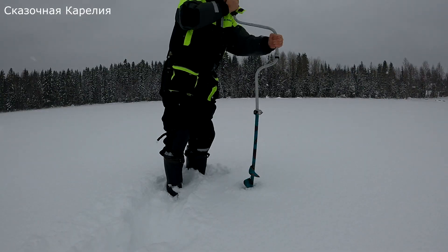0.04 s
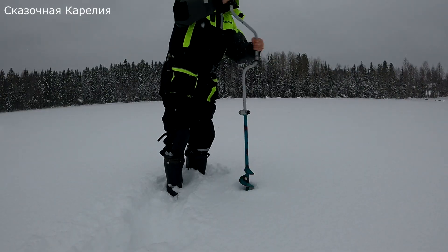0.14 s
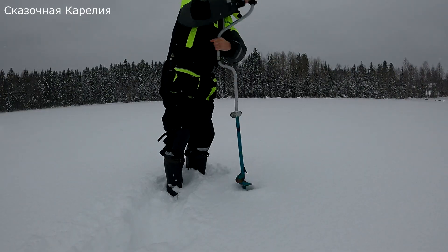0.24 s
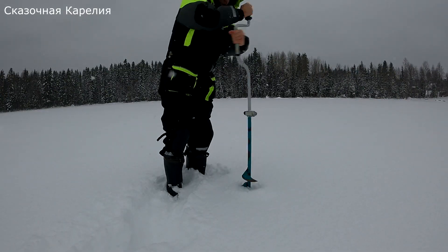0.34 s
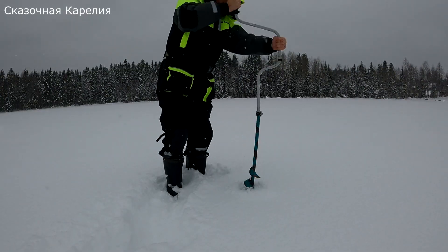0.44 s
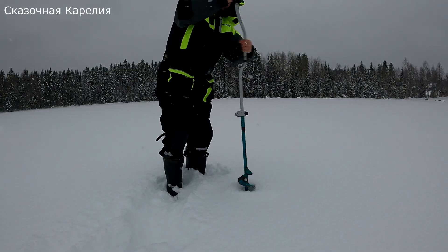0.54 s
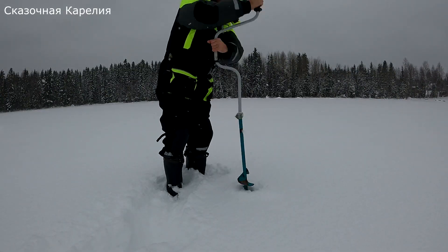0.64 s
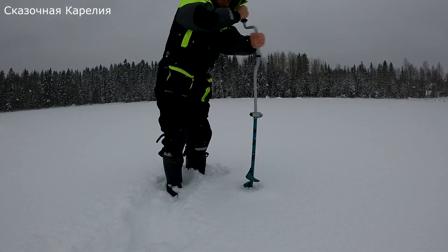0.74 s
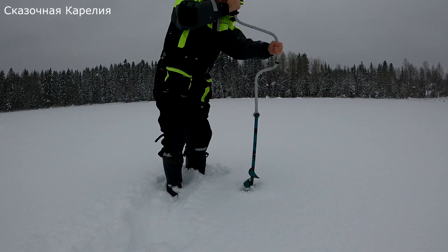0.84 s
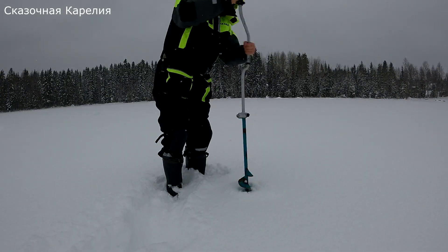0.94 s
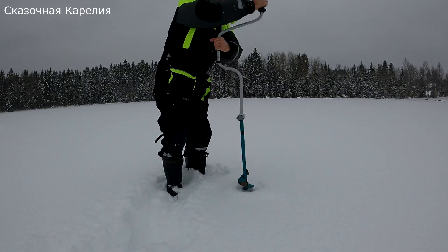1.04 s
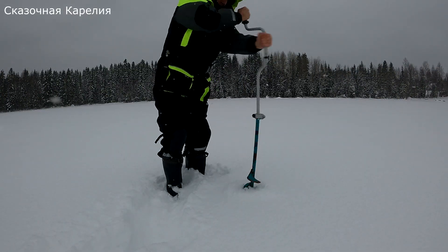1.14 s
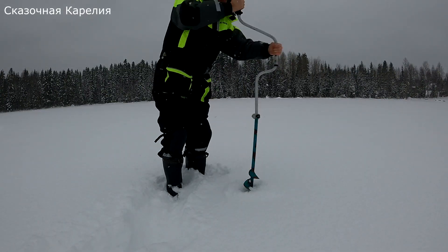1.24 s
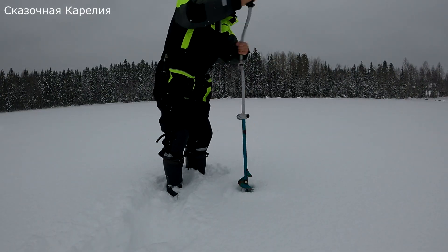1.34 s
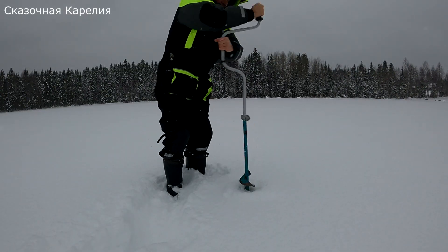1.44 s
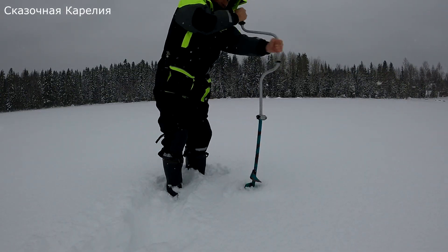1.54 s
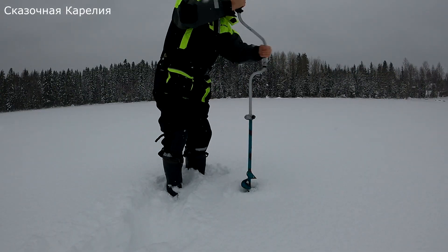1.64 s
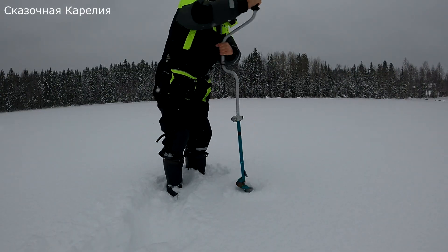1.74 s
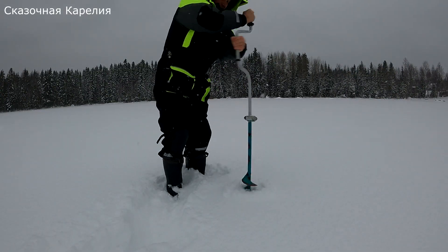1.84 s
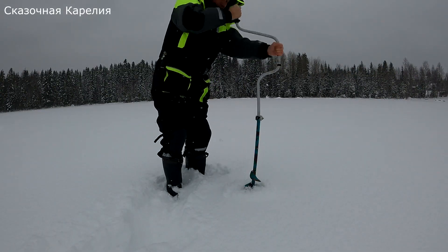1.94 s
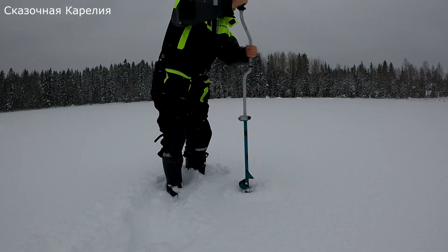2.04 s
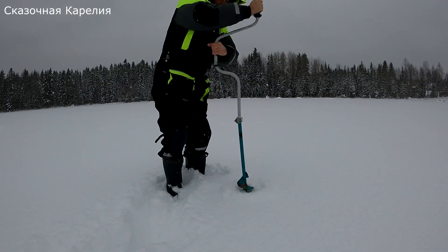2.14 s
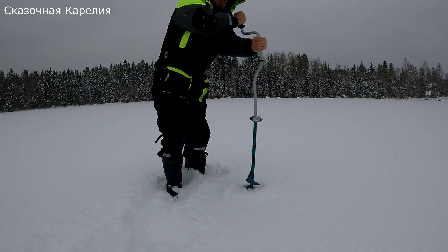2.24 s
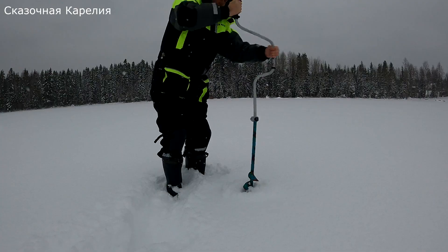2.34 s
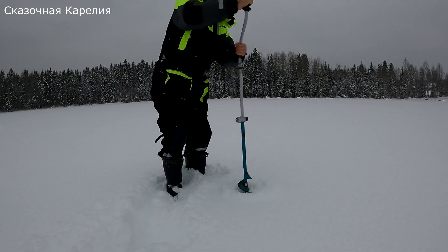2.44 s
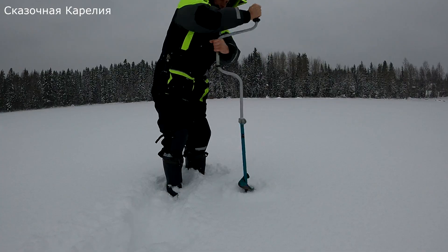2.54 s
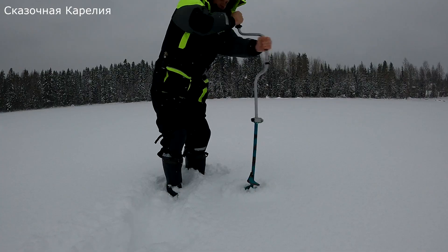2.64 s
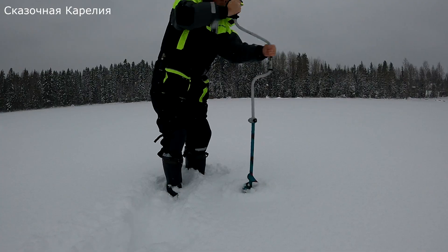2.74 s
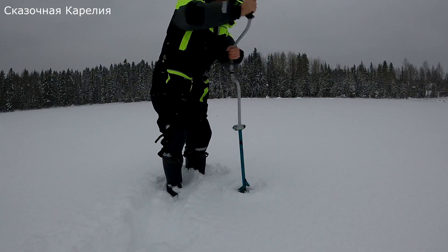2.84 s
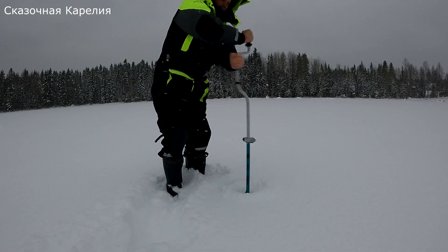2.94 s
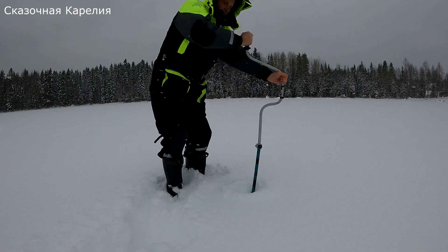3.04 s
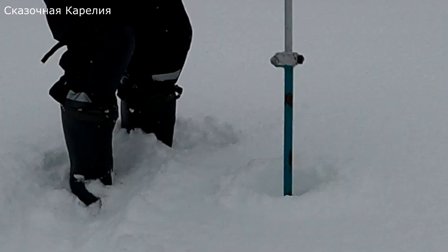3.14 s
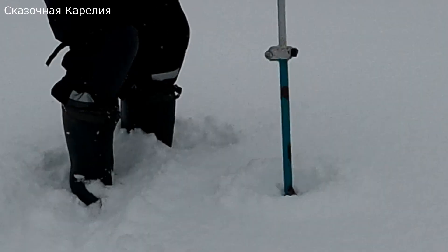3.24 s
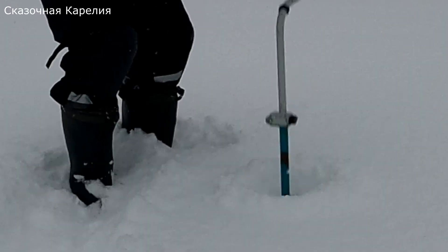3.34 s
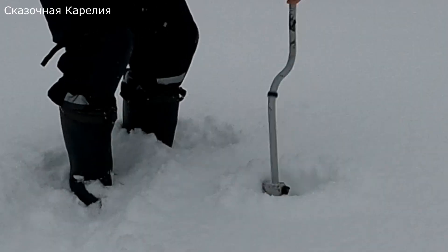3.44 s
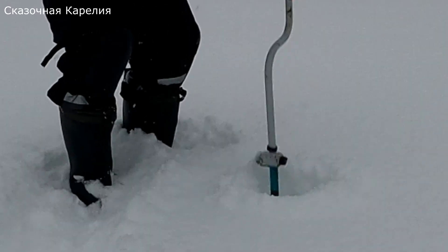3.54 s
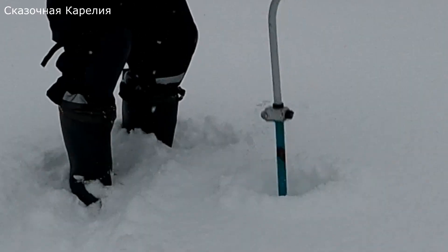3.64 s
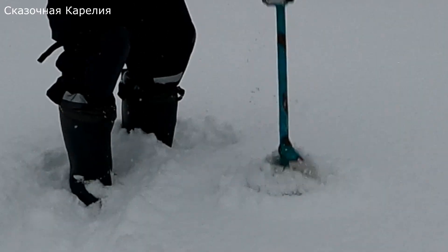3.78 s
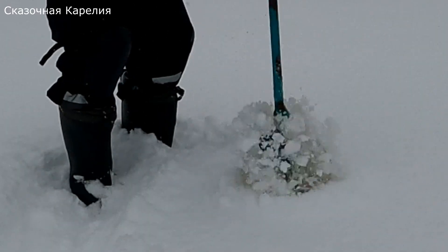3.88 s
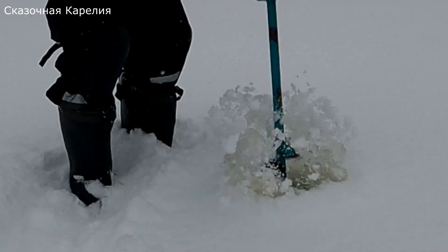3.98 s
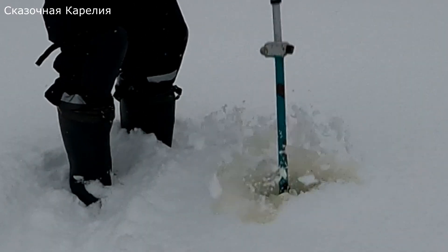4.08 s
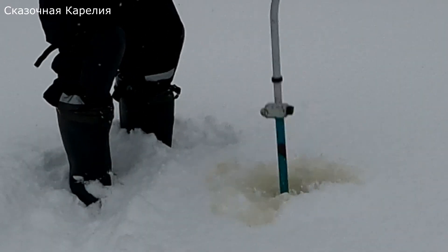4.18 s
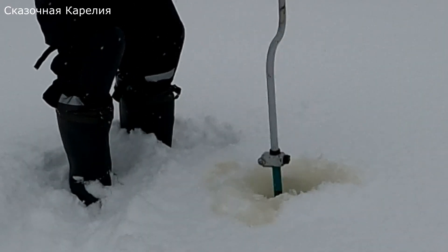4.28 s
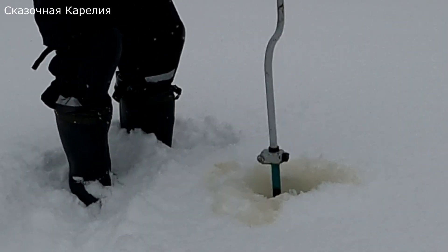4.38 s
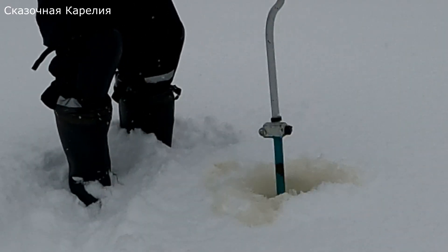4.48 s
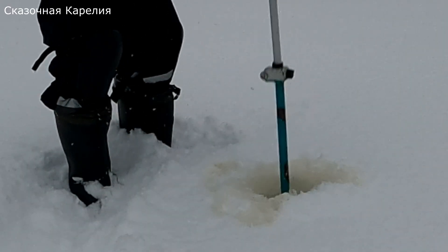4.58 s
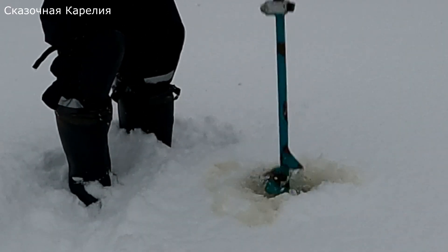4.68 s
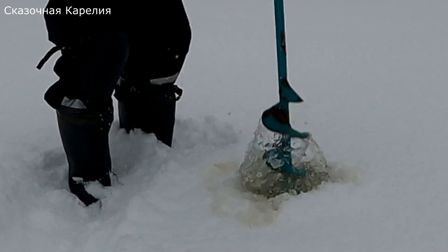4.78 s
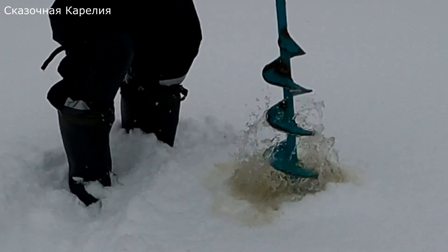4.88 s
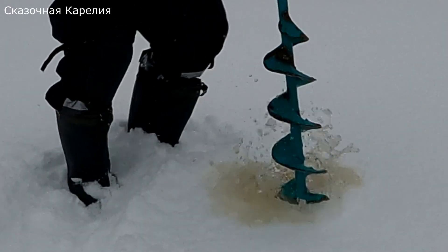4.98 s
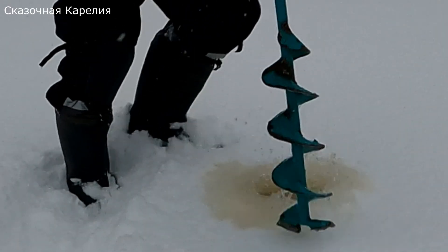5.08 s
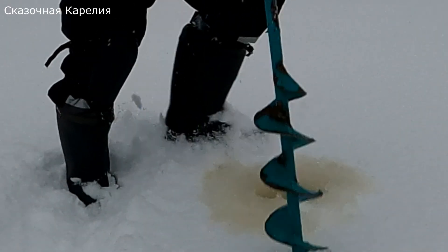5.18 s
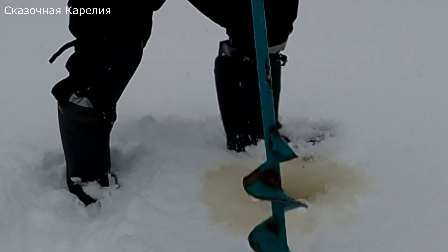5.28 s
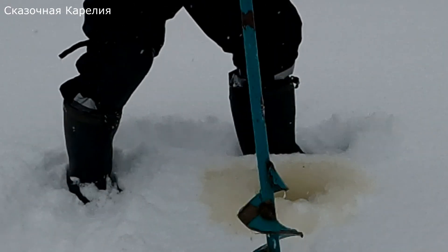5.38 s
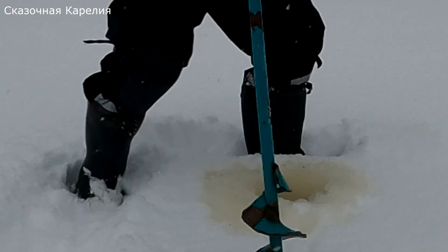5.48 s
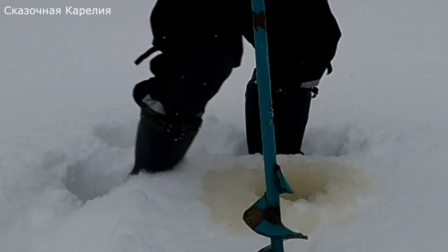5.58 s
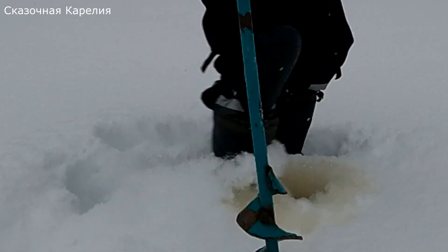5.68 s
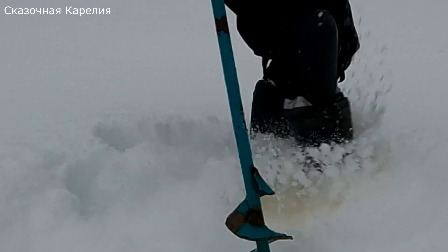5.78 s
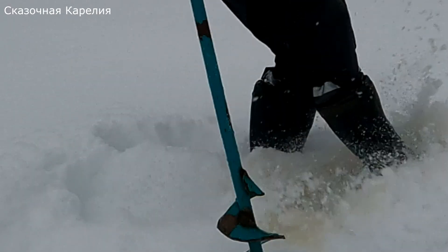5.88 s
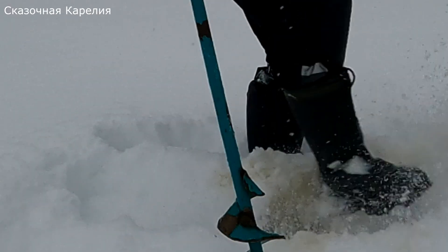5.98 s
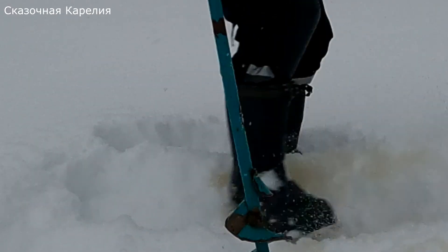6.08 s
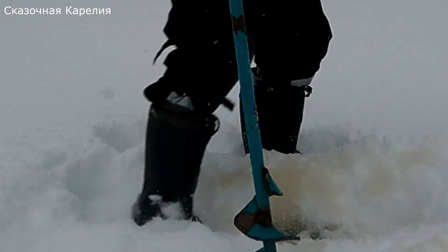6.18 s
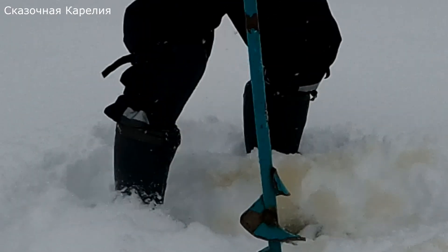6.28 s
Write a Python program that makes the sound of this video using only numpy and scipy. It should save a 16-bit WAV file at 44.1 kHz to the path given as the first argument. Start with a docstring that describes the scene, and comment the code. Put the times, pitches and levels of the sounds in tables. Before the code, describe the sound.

Gritty metallic grinding pulses about three times a second, stops abruptly, then wet splashes, bubbling gulps and low thumps from an ice hole.

```python
"""Hand auger through lake ice

Chips rattle the steel flights of a hand auger, swelling with each pull of the crank: noise excites drifting modes.
The blades break through and the auger is pumped in the hole. Slush splashes as enveloped noise and small bubbles;
trapped air, low knocks and small drips sound as short rising tones, and the hole booms as resonant low noise.
A boot kicks the slush away. A light wind presses on the microphone as very low noise. Left and right are nearly alike.
"""
import sys
import numpy as np
from scipy import signal
from scipy.fft import rfft, irfft, next_fast_len
from scipy.io import wavfile
from scipy.ndimage import uniform_filter1d, map_coordinates

SR = 44100
rng = np.random.default_rng(int(sys.argv[2]) if len(sys.argv) > 2 else 0)


def master_out(mix):
    """Clip the mix to full scale and print it as 16-bit PCM to the path in sys.argv[1]."""
    frames = np.transpose(np.atleast_2d(mix))
    ceiling = np.clip(frames, -1, 1)
    pcm = np.round(ceiling * 32767).astype(np.int16)
    wavfile.write(sys.argv[1], SR, pcm)


N = 278530


def amp(db):
    """Level in decibels to amplitude ratio."""
    return 10 ** (np.asarray(db) / 20)


def unit(x):
    """Normalisation to an rms of 1."""
    return x / np.sqrt(np.mean(x ** 2) + 1e-20)


def colour(points):
    """Spectral envelope: gain interpolated in dB between (Hz, dB) points on a log frequency axis."""
    f, level_db = np.transpose(points)
    return lambda hz: amp(np.interp(np.log(hz + 1), np.log(f + 1), level_db))


def modes(rows):
    """Modal superposition: noise-fed resonances (Hz, width Hz, dB) add in power."""
    def gain(f):
        power = 0
        for centre, width, db in rows:
            damping = (f * width) ** 2
            power = power + amp(db) ** 2 * damping / ((centre * centre - f * f) ** 2 + damping)
        return np.sqrt(power)
    return gain


def gains(rows):
    """Level automation: one gain per sample for each dB column, interpolated in dB over time."""
    s, *columns = np.transpose(rows)
    return [amp(np.interp(np.arange(N) / SR, s, db)) for db in columns]


def wobble(rate):
    """Band-limited random drift: a smooth curve through normal draws, rate knots a second (at most 390)."""
    knots = rng.standard_normal(int(N / SR * 400))
    return map_coordinates(knots, [np.arange(N) * min(rate, 390) / SR])


def filtered(x, response):
    """Linear filtering: the spectrum of x times a complex response of frequency."""
    m = next_fast_len(N + SR // 2)
    return irfft(rfft(x, m) * response(np.fft.rfftfreq(m, 1 / SR)), m)[..., :N]


def grit(spiky_db, clump_db, rate):
    """Granular impact noise: white noise with spiky sample sizes that come in clumps; rms 1."""
    spikes = np.minimum(rng.exponential(size=N), 5)
    clumps = np.tanh(wobble(rate) / 2)
    return unit(rng.standard_normal(N) * amp(spiky_db * spikes + clump_db * clumps))


def patchy(x, depth_db, size=8):
    """Spectro-temporal modulation: random gain patches, size bins by size frames; rms 1."""
    z = signal.stft(x, nperseg=512)[2]
    field = uniform_filter1d(rng.standard_normal(z.shape), size=size, axis=0)
    field = uniform_filter1d(field, size=size, axis=1)
    return unit(signal.istft(z * amp(depth_db * unit(field)), nperseg=512)[1][:N])


def lump(t, length, rise):
    """Transient envelope: quick rise, then a smooth fall."""
    return np.exp(-(t / length) ** 1.51) * (1 - np.exp(-t / (rise * length)))


def auger():
    """Fracture noise drives modal ringing: chips break off in bursts and ring the steel; the shavings hiss."""
    # spectrum of the breaking chips: pitch_hz, level_db
    chip_spectrum = [(90, 2), (500, 3), (2000, 0), (4300, -0.5), (6500, -18), (9000, -53)]
    # spectrum of the hissing shavings: pitch_hz, level_db
    shaving_spectrum = [(4500, -14), (7200, -5), (11400, -5.5), (15900, -14.5)]
    chatter, hiss, sheen = cranking()
    bite = wobble(40.07)  # shared by chips and shavings
    chips = grit(spiky_db=3.2, clump_db=5.5, rate=200) * amp(1.2 * bite)
    body = patchy(flights(filtered(chips, colour(chip_spectrum))), depth_db=1.5, size=8)
    blades = filtered(body, lambda hz: np.exp(-((hz - 3200) / 900) ** 2))
    body = body + ((chatter / amp(-27.0)) ** 0.55 - 1) * blades  # a harder bite rings the blade modes more
    top_modes = filtered(body, lambda hz: np.exp(-((hz - 5300) / 1200) ** 2))
    body = body + (sheen - 1) * top_modes
    shavings = grit(spiky_db=2.0, clump_db=4.0, rate=110) * amp(1.4 * bite)
    shavings = filtered(shavings, colour(shaving_spectrum))
    return chatter * body + hiss * patchy(shavings, depth_db=2.5, size=12)


def cranking():
    """Periodic forcing by the crank: chatter, hiss and top-mode gains, the chatter sagging between half turns."""
    # half turns of the crank: start_s, chatter_db, shaving_hiss_db, chatter_dip_at_start_db
    strokes = [(-0.22, -24, -34, 8), (0.149, -25.5, -35, 3.5), (0.58, -25.5, -34, 2.5),
               (0.93, -25.5, -36, 1), (1.35, -25.5, -36, 1), (1.721, -27, -35, 2.5), (2.049, -26, -33, 4),
               (2.428, -27.5, -34.5, 2.5), (2.83, -27, -36.5, 2.5)]
    # blades digging in: centre_s, extra_chatter_db, extra_hiss_db
    catches = [(0.378, 3.5, -1.5), (0.508, 4.5, 3.5), (0.69, 3.5, 0), (1.106, 3, -2), (1.175, 3.5, 1.5),
               (1.268, 4.5, 4.5), (1.57, 0, 4), (1.74, 1, 5), (1.94, 2.5, 4), (2.942, 3.5, -2.5)]
    catch_s = 0.033  # Gaussian width of a catch
    slack_share = 0.16  # Gaussian width of the hands' change-over, as a share of a stroke
    dull_start_db = 4  # the top steel modes are this much weaker at the start of a stroke than at its end
    # the blades break through and fall silent
    through_s, chatter_fade_db_per_s, hiss_fade_db_per_s = 2.955, 130, 306

    t = np.arange(N) / SR
    start, chatter_db, hiss_db, dip_db = np.transpose(strokes)
    last = len(start) - 1
    ends = np.append(start, 2 * start[-1] - start[-2])  # the last stroke lasts as long as the one before
    turn = np.interp(t, ends, np.arange(len(start) + 1))
    stroke = np.minimum(turn.astype(int), last)
    nearest_start = np.minimum(np.round(turn).astype(int), last)
    done = turn - stroke  # share of the stroke completed
    slack = np.exp(-(np.minimum(done, 1 - done) / slack_share) ** 2)
    chatter_db = chatter_db[stroke] - dip_db[nearest_start] * slack
    hiss_db = hiss_db[stroke]
    for s, more_db, brighter_db in catches:
        dig = np.exp(-((t - s) / catch_s) ** 2)
        chatter_db = chatter_db + more_db * dig
        hiss_db = hiss_db + brighter_db * dig
    after = np.maximum(t - through_s, 0)
    chatter = amp(chatter_db - chatter_fade_db_per_s * after)
    hiss = amp(hiss_db - hiss_fade_db_per_s * after)
    sheen = amp(-dull_start_db * (1 - done) ** 3)
    return chatter, hiss, sheen


def flights(x):
    """Time-varying resonance: the steel modes drift and trade strength as the load on the blades shifts."""
    # steel modes at rest: pitch_hz, width_hz, level_db
    steel_modes = [(558.6, 7.5, 11.5), (1043, 85, 8), (1354, 23, 12.5), (1604, 9, 15.5), (1830, 205, 8),
                   (2607, 27, 13.5), (3040, 220, 4), (3440, 90, 4), (3714, 28, 7.5), (5015, 250, 10),
                   (5493, 82, 18.5), (6080, 77, 18)]
    # scale of the random pitch drift (share) and level swing, knots of the swing curve a second
    wander, swap_db, swap_rate = 0.012, 3, 32
    hz, t, z = signal.stft(x, SR, nperseg=1024)
    at = np.minimum((t * SR).astype(int), N - 1)
    moving = []
    for centre, width, db in steel_modes:
        drifting_hz = centre * (1 + wander * wobble(swap_rate / 2)[at])
        swinging_db = db + swap_db * wobble(swap_rate)[at]
        moving.append((drifting_hz, width, swinging_db))
    gain = np.hypot(1, modes(moving)(hz[:, None]))  # the modes add in power to the direct sound
    return signal.istft(z * gain, SR, nperseg=1024)[1][:N]


def slush():
    """Turbulent splash noise with bubble resonance: wash and fizz, loud in each splash, trickling between."""
    # trickle between splashes: time_s, wash_db, fizz_db
    trickle = [(2.9, -97, -76), (3.0, -40.5, -46.5), (3.23, -47.5, -47), (3.4, -38, -48),
               (3.64, -61.5, -60.5), (3.73, -41.5, -45.5), (4.15, -33, -41.5), (4.53, -43.5, -47.5),
               (4.75, -34, -42.5), (5.35, -51.5, -54.5), (6.02, -52.5, -59.5), (6.26, -58.5, -57.5)]
    # slush and chips landing, levels and decay of the envelope: start_s, slap_db, spray_db, length_s
    splashes = [(3.055, -40, -38, 0.04), (3.095, -35, -29, 0.0041), (3.147, -50, -29, 0.0034),
                (3.238, -21, -28, 0.0045), (3.284, -31, -35.5, 0.017), (3.338, -49, -37, 0.029),
                (3.397, -26, -28, 0.016), (3.423, -38, -28, 0.0066), (3.441, -49, -32, 0.01),
                (3.536, -35.5, -57, 0.004), (3.651, -65, -37, 0.0069), (3.669, -29.5, -31, 0.014),
                (3.717, -17, -21.5, 0.0073), (3.764, -25, -30.5, 0.0079), (3.848, -19.5, -36, 0.02),
                (3.881, -31, -34.5, 0.03), (3.993, -25, -35, 0.026), (4.071, -32, -34.5, 0.03),
                (4.112, -29, -28.5, 0.0067), (4.144, -24.5, -33, 0.009), (4.177, -32, -33, 0.023),
                (4.234, -24.5, -26.5, 0.011), (4.274, -25, -45, 0.029), (4.289, -32, -28.5, 0.0059),
                (4.346, -22.5, -65, 0.0057), (4.362, -30, -37, 0.049), (4.442, -28, -36, 0.0084),
                (4.508, -29, -32.5, 0.013), (4.574, -13, -24, 0.0079), (4.618, -25, -33, 0.016),
                (4.672, -19, -32.5, 0.019), (4.72, -18, -33, 0.015), (4.778, -34, -36, 0.021),
                (4.804, -34, -34, 0.01), (4.982, -29.5, -43.5, 0.013), (5.118, -67, -39.5, 0.099),
                (5.285, -45, -45, 0.006), (5.595, -38, -51, 0.016), (5.647, -45, -46, 0.0038),
                (5.76, -64, -42, 0.087), (5.796, -19.5, -26, 0.017), (5.865, -35.5, -59, 0.009),
                (5.93, -40, -60, 0.0028), (5.99, -35.5, -35, 0.011), (6.007, -39, -40.5, 0.019),
                (6.051, -47, -44.5, 0.024), (6.1, -58, -44, 0.027), (6.19, -48, -43, 0.0044)]
    # spectrum of the low wash: pitch_hz, level_db
    wash_spectrum = [(120, 0), (260, -7), (330, 0), (900, -7.5), (1900, -6), (2400, -46)]
    # spectrum of the high fizz: pitch_hz, level_db
    fizz_spectrum = [(1100, -10.5), (3040, 2), (5130, -1.5), (13200, -17.5), (15900, -25)]
    # while the auger pumps water: big bubbles; before and after, crumbs of ice and snow
    wet_start_s, wet_end_s = 3.65, 5.15

    wash, fizz = gains(trickle)
    t = np.arange(SR // 4) / SR
    for s, slap_db, spray_db, length in splashes:
        shape = lump(t, length, rise=0.12)
        at = slice(round(s * SR), round(s * SR) + len(t))
        wash[at] += (amp(slap_db) * shape)[:len(wash[at])]
        fizz[at] += (amp(spray_db) * shape)[:len(fizz[at])]
    drops = grit(spiky_db=1.0, clump_db=7.5, rate=260)
    ticks = (rng.random(N) < 60 / SR) * rng.standard_normal(N)  # single droplets and ice crumbs, about 60 a second
    wet = (np.arange(N) > wet_start_s * SR) & (np.arange(N) < wet_end_s * SR)
    gurgle = 1.3 * bubbles(count=6000, centre_hz=850, cycles=8)
    crumbs = 1.4 * bubbles(count=7000, centre_hz=1400, cycles=3)
    low = unit(filtered(drops, colour(wash_spectrum))) + np.where(wet, gurgle, crumbs)
    high = unit(filtered(drops + 8 * ticks, colour(fizz_spectrum)))
    high = high + 0.42 * bubbles(count=2500, centre_hz=3720, cycles=11.0)
    return wash * patchy(low, depth_db=3, size=4) + fizz * patchy(high, depth_db=2.5)


def bubbles(count, centre_hz, cycles):
    """Damped bubble oscillation: random onsets, soft start, rising pitch, a few cycles; rms 1 in all."""
    biggest_db = 14  # range of the random bubble levels
    draw = rng.random((count, 3))  # onset, pitch and size of each bubble
    t = np.arange(1024) / SR
    hz = centre_hz * np.exp(1.565 * (draw[:, 1:2] - .5))
    age = t * hz / cycles
    size = amp(biggest_db * draw[:, 2:] ** 2)
    tone = size * np.sin(2 * np.pi * hz * t * (1 + 0.096 * age)) * age * np.exp(-3 * age)
    at = (draw[:, :1] * N).astype(int) + np.arange(1024)
    return unit(np.bincount(at.ravel(), tone.ravel(), N + 1024)[:N])


def gulps_knocks_and_drips():
    """Damped tones with rising frequency: trapped air, low knocks and small drips, each slightly unsteady."""
    # short tones of trapped air, low knocks and small drips, level before the envelope, pitch at the start:
    # start_s, level_db, pitch_hz, length_s
    short_tones = [(3.533, -22.5, 101, 0.019), (3.675, -22.5, 133, 0.018), (3.718, -16, 580, 0.0069),
                   (3.852, -20, 462, 0.024), (3.853, -11, 743, 0.007), (3.903, -15, 871, 0.022),
                   (3.921, -19.5, 503, 0.012), (3.998, -20, 604, 0.018), (4.0, -15, 866, 0.011),
                   (4.075, -26.5, 1730, 0.015), (4.12, -16, 570, 0.0066), (4.202, -11, 454, 0.0026),
                   (4.513, -17.5, 338, 0.035), (4.571, -15.5, 315, 0.034), (4.673, -13, 682, 0.013),
                   (4.68, -17, 473, 0.019), (4.728, -10, 442, 0.012), (4.792, -14, 890, 0.0079),
                   (4.805, -27.5, 345, 0.033), (5.012, -32, 1580, 0.011), (5.093, -22.5, 600, 0.0052),
                   (5.677, -30.5, 1830, 0.006)]
    out, t = np.zeros(N + SR), np.arange(SR // 4) / SR
    for s, db, hz, length in short_tones:
        phase = 2 * np.pi * hz * t * (1 + 0.015 * t / length)
        phase = phase + 0.5 * wobble(190)[:len(t)]
        out[round(s * SR):][:len(t)] += amp(db) * lump(t, length, rise=0.16) * np.sin(phase)
    return out[:N]


def boom():
    """Low-frequency resonance: ice and water around the hole sound one unsteady note, loud at each thump."""
    # resonances of the hole, for one pass of the filter: pitch_hz, width_hz, level_db
    hole_modes = [(45.6, 4.7, 10), (80, 92, -1.5)]
    # the ice sheet and the water column thumping, level before the envelope: start_s, level_db
    thumps = [(0.88, -34), (2.96, -31), (3.2, -30.5), (3.52, -29), (3.72, -39), (4.22, -25), (4.57, -25),
              (5.8, -32.5), (6.1, -37)]
    thump_s, hum_db = 0.15, -42.5  # decay of a thump, steady level between thumps
    t = np.arange(N) / SR
    level = amp(hum_db)
    for s, db in thumps:
        level = level + amp(db) * lump(np.maximum(t - s, 0), thump_s, rise=0.13)
    note = filtered(rng.standard_normal(N), lambda hz: modes(hole_modes)(hz) ** 2)  # twice through: steep skirts
    return level * unit(note)


def wind():
    """Turbulent pressure fluctuation: slow random swings on the microphone."""
    # strength of the wind: time_s, level_db
    gusts = [(0.1, -24), (0.82, -15.5), (2.44, -20), (2.87, -20), (3.28, -31.5), (4.03, -16), (5.6, -24),
             (5.75, -15), (6.2, -14.5)]
    # spectrum of the pressure swings: pitch_hz, level_db
    buffet_spectrum = [(1, 3), (3, 3), (6, 0), (12, -8), (24, -21), (36, -27), (60, -40), (300, -75)]
    swings = filtered(rng.standard_normal(N), lambda hz: colour(buffet_spectrum)(hz) * (hz > .5))
    return gains(gusts)[0] * unit(swings)


def scene():
    """Linear superposition: all sources sit in the middle; the two channels part only faintly."""
    apart_db = -49.5  # half the difference of left and right, relative to the middle
    middle = auger() + slush() + gulps_knocks_and_drips() + boom() + wind()
    # a quarter turn of phase keeps left and right equally loud
    side = filtered(middle, lambda hz: 1j * amp(apart_db) * (hz > 0))
    return np.array([middle + side, middle - side])


def record(dry):
    """Band-stop filtering: the microphone housing cuts notches; nothing is kept above the band limit."""
    # notches of the housing, depth as a share from 0 to 1: pitch_hz, width_hz, depth
    notches = [(872, 35, 0.79), (2117, 680, 0.47), (4220, 300, 0.23)]
    top_hz = 15900

    def housing(f):
        gain = 1
        for centre, width, depth in notches:
            damping = 1j * f * width
            gain = gain * (1 - min(depth, 1) * damping / (centre * centre - f * f + damping))
        return gain

    return filtered(dry, lambda hz: housing(hz) * (hz < top_hz))


dry = scene()
out = record(dry)
master_out(out)
```